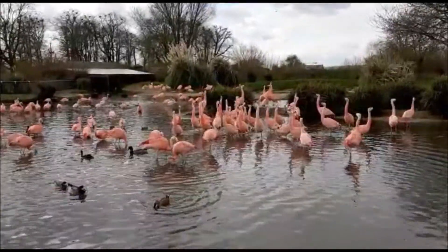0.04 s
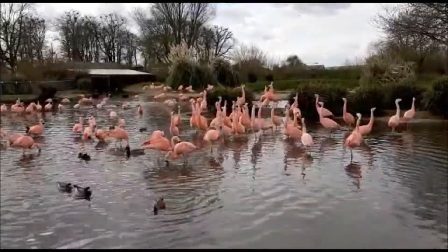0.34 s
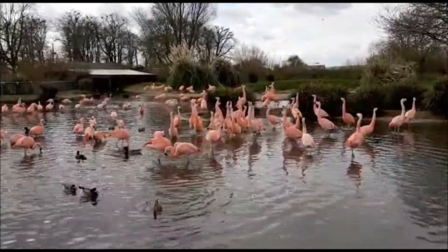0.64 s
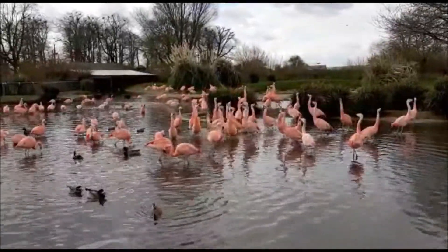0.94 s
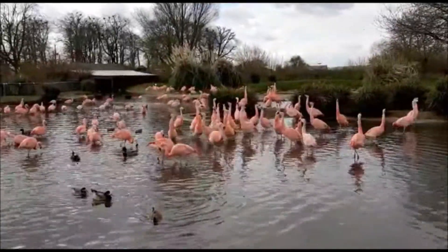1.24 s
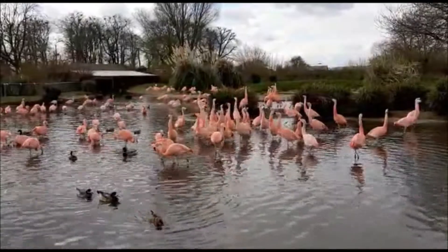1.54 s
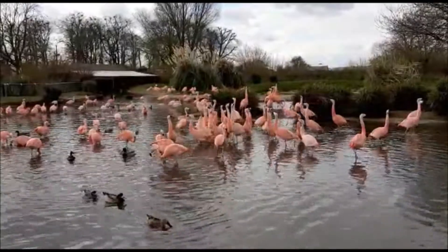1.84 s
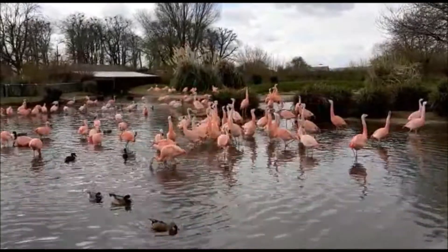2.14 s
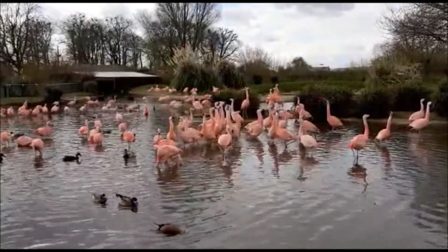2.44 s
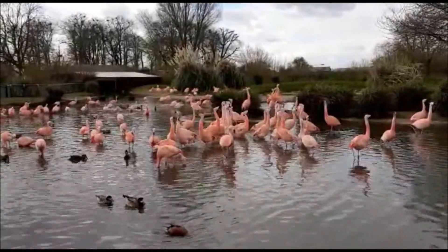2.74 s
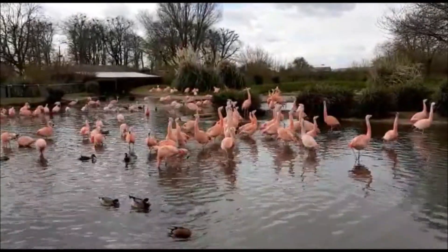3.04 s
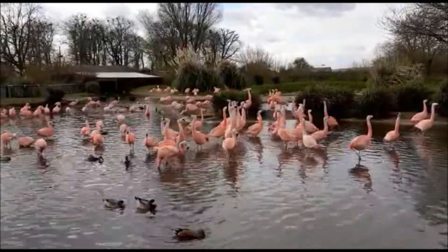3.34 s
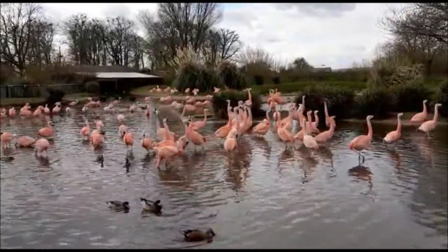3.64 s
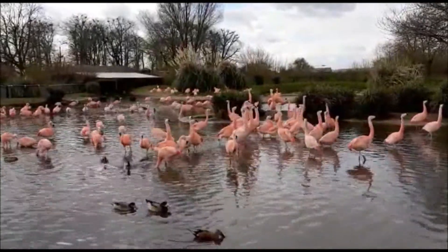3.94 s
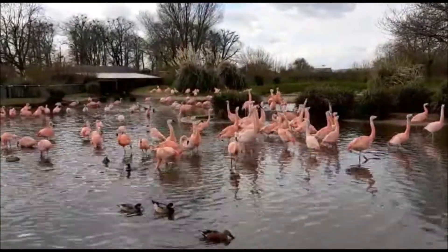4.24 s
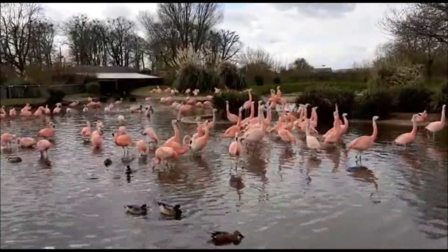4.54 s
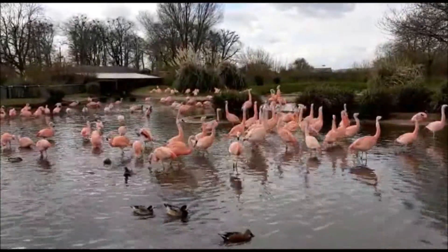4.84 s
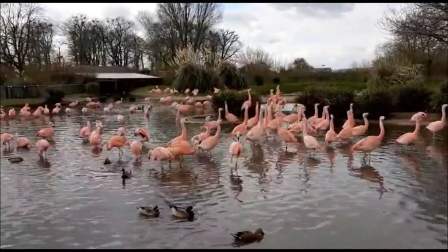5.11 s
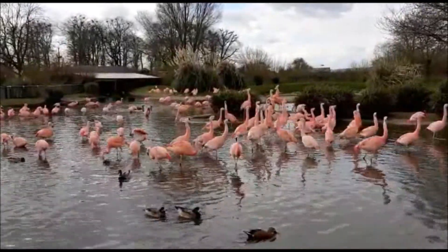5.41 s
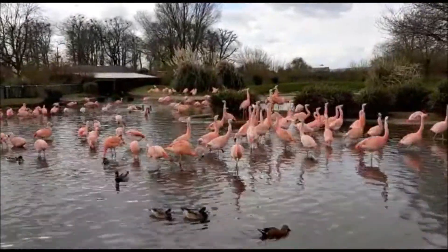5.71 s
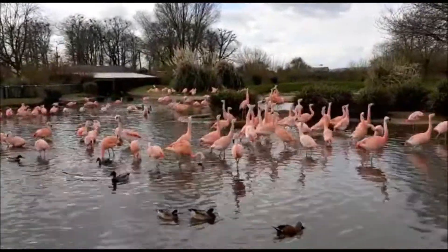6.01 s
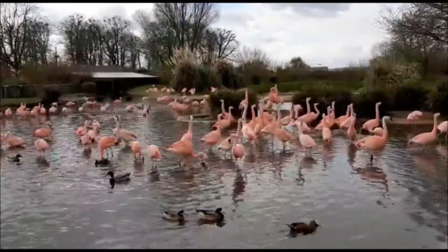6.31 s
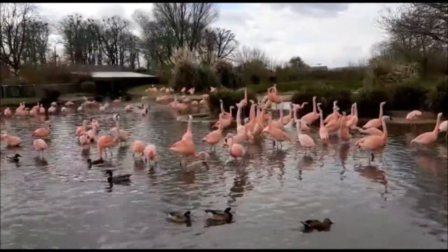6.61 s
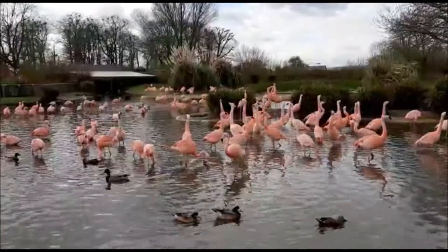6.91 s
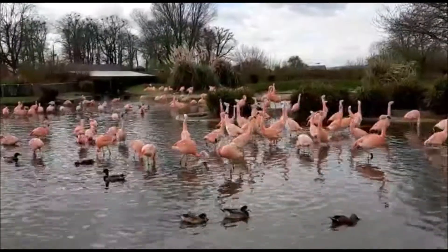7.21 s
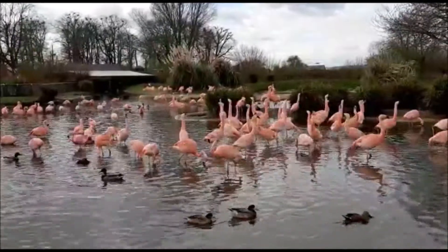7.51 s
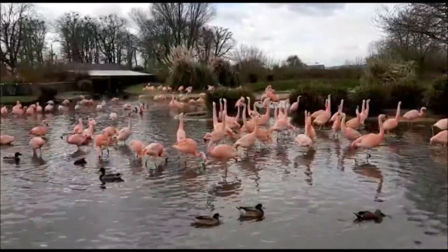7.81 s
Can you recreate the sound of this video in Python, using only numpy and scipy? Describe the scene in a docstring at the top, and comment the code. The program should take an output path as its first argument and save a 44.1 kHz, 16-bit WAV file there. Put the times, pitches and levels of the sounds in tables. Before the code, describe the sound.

Close microphones beside an outdoor pond pick up flamingos honking, grunting and gabbling over one another, with bursts of bill clacking. Behind them are distant flock chatter, light drips, low sloshing and a few plops. The calls are busiest in the first half, then ease into soft clucking. At the very end another bird gives four quick, hoarse yelps. Only faint echoes come back from the banks.

```python
"""Flamingos wading in a pond

A flock honks, grunts, gabbles and clucks: pulses of air from each voice box ring the throat, mouth
and bill. Most honks start as a rattle and clear into a tone. Bills clack, small birds peep, a
harsher bird yelps near the end, and legs stir the water. Two close microphones hear the near birds
almost dry, with faint echoes from the banks."""
import sys
import numpy as np
from scipy import signal
from scipy.fft import rfft, irfft
from scipy.io import wavfile
from scipy.ndimage import uniform_filter1d

SR = 44100
rng = np.random.default_rng(int(sys.argv[2]) if len(sys.argv) > 2 else 0)


def int16_out(signal):
    """Quantize to a 16-bit WAV file."""
    q = np.round(np.clip(np.atleast_2d(signal).T, -1, 1) * 32767)
    wavfile.write(sys.argv[1], SR, q.astype(np.int16))


N = 351036
TIME = np.arange(N) / SR
PULSES_PER_S, BILL_HZ = 101, 3817  # an ordinary rattle: its pace and the pitch at which the bill rings

# How busy the far flock and the water are over time: time_s, flock_db, water_db
ACTIVITY = [(0.0, -50, -74), (0.25, -52, -78), (0.64, -49, -72), (0.82, -53, -80), (1.33, -46, -67),
            (1.6, -53, -75), (2.0, -55, -77), (2.26, -49, -72), (2.46, -47, -76.5), (2.66, -49.5, -68),
            (3.0, -53, -77), (3.48, -55, -79), (4.19, -49, -72.5), (4.43, -52, -79), (4.74, -52, -68.5),
            (4.99, -59.5, -80), (7.29, -53, -80), (7.63, -63.5, -81.5), (7.87, -56.5, -74.5),
            (7.96, -56, -75)]


def amp(db):
    """Turn decibels into a gain."""
    return 10 ** (np.asarray(db) / 20)


def unit(x):
    """Scale a sound to an average power of one."""
    return x / np.sqrt(np.mean(x ** 2) + 1e-20)


def read(points, hz):
    """Read a value off a curve of (frequency, value) points."""
    f, value = np.transpose(points)
    return np.interp(np.log(hz + 1), np.log(f + 1), value)


def level(curve, column):
    """A gain for every sample, from a table of times and decibels."""
    rows = np.array(curve)
    return amp(np.interp(TIME, rows[:, 0], rows[:, column]))


def add(mix, start_s, sound, pan_db=0):
    """Place a sound in a stereo mix; a positive pan_db moves it left."""
    part = mix[:, max(round(start_s * SR), 0):][:, :len(sound)]
    part += amp([[pan_db / 2], [-pan_db / 2]]) * sound[:part.shape[1]]


def lag_left(x, samples):
    """Sound from the right reaches the left microphone a few samples late."""
    return np.array([np.roll(x[0], samples), x[1]])


def drift(count, per_s):
    """A random wander of about size one, with per_s new values a second."""
    knots = rng.standard_normal(int(count / SR * per_s) + 2)
    return np.interp(np.arange(count) / SR * per_s, np.arange(len(knots)), knots)


def course(start, end):
    """Position within a call, named u below: -1 at the start, 1 at the end."""
    return np.linspace(-1, 1, max(int((end - start) * SR), 256))


def phase(hz):
    """The running angle of a tone whose pitch changes."""
    return 2 * np.pi * np.cumsum(hz) / SR


def fade(u, share):
    """Fade in and out; the two fades together take this share of the call."""
    return signal.windows.tukey(len(u), share)


def resonance(hz, width):
    """A gain curve with one steep-sided peak."""
    return lambda f: (1 + ((f * f - hz * hz) / (2 * width * (f + 1))) ** 2) ** -2


def resonances(peaks):
    """A gain curve with several peaks, each given as pitch_hz, width_hz, level_db."""
    return lambda f: sum(amp(db) * resonance(hz, width)(f) for hz, width, db in peaks)


def ring(x, gain, size=2048):
    """Filter a sound by a gain curve so that it rings on a little, and even out its power."""
    log_gain = np.log(np.maximum(gain(abs(np.fft.fftfreq(size, 1 / SR))), 1e-5))
    taps = np.fft.ifft(np.exp(np.conj(signal.hilbert(log_gain)))).real[:size // 2]
    y = signal.fftconvolve(x, taps)
    return y / np.sqrt(np.sum(y ** 2) / len(x) + 1e-20)


def wash(gain, alike, patchy_db):
    """Stereo noise shaped by a gain curve, with drifting patches; alike=1 makes both sides the same."""
    hz = np.fft.rfftfreq(1024, 1 / SR)
    a, b, c, d, patches = rng.standard_normal((5, N // 256 + 5, len(hz)))
    patches = unit(uniform_filter1d(uniform_filter1d(patches, size=9, axis=0), size=10, axis=1))
    left = a + 1j * b
    right = alike * left + np.sqrt(1 - alike ** 2) * (c + 1j * d)
    spectra = np.array([left, right]) * gain(hz) * amp(patchy_db * patches)
    return unit(signal.istft(spectra.transpose(0, 2, 1), nperseg=1024, noverlap=768)[1][:, :N])


def banks(x, early_db, tail_db, early_s=0.036):
    """Echoes: quick scatter off the ripples, then a thin tail from hedges and trees."""
    # Time the tail takes to fall by 60 dB: frequency_hz, decay_s
    decay_times = [(150, 0.45), (1400, 0.19), (4000, 0.32), (12000, 0.015)]
    t = TIME[:SR * 2 // 3]
    noise = rng.standard_normal((2, len(t)))
    early = noise * np.exp(-t / early_s)
    hz, when, spectra = signal.stft(noise * (1 - np.exp(-t / 0.0031)), SR, nperseg=256)
    decay = amp(-60 * when / read(decay_times, hz)[:, None])
    tail = signal.istft(spectra * decay, SR, nperseg=256)[1][:, :len(t)]
    echo = amp(early_db) * early / np.linalg.norm(early[0])
    echo += amp(tail_db) * tail / np.linalg.norm(tail[0])
    return signal.fftconvolve(x, echo, axes=1)[:, :N]


def rumble():
    """A steady, distant rumble."""
    # Tone colour of the rumble: frequency_hz, gain_db
    colour = [(20, -59.5), (35, -26), (50, -6.5), (90, -4), (150, -11.5), (400, -36)]
    return amp(-69) * wash(lambda f: amp(read(colour, f)), alike=0.47, patchy_db=4.4)


def wind(puff_s=0.11, puff_hz=60.6):
    """Soft, low puffs of wind on the microphones."""
    # The puffs: middle_s, level_db
    gusts = [(6.22, -61), (6.7, -59)]
    strength = sum(amp(db) * np.exp(-((TIME - s) / puff_s) ** 2) for s, db in gusts)
    return strength * wash(resonance(puff_hz, 60), alike=0.5, patchy_db=1.5)


def slosh():
    """Wading birds push the water about with a low slosh."""
    # Strength of the slosh: time_s, level_db
    strength = [(0.0, -54.5), (0.38, -65.5), (0.42, -55), (0.97, -70), (1.37, -48), (1.48, -58),
                (2.1, -58.5), (2.28, -51.5), (2.48, -67.5), (2.77, -54.5), (3.37, -67.5), (4.3, -59),
                (4.32, -63), (5.74, -74), (6.01, -65), (7.65, -70), (7.89, -61.5), (7.96, -68)]
    # Its tone colour: frequency_hz, gain_db
    colour = [(40, -33.5), (80, -1.5), (110, -7), (190, 0.5), (300, -4), (420, -14), (900, -18.5),
              (2000, -73.5)]
    noise = wash(lambda f: amp(read(colour, f)), alike=0.98, patchy_db=4.07)
    return amp(1) * level(strength, column=1) * noise


def drips(per_s=70):
    """Small drips around wading legs, each a very short, high ping."""
    mix, t = np.zeros((2, N)), TIME[:SR // 100]
    for when, pitch, size, side in rng.random((int(per_s * N / SR), 4)):
        hz = 1700 * 4 ** pitch
        ping = np.sin(2 * np.pi * hz * t) * t * hz * np.exp(-t * hz / 2)
        add(mix, when * N / SR, amp(38 * size ** 3) * ping, 10 * (side - .5))
    return level(ACTIVITY, column=2) * amp(6) * unit(mix)


def fizz(flicker_db=2.8):
    """Stirred water sputters with a flickering hiss."""
    # Tone colour of the hiss: frequency_hz, gain_db
    colour = [(1500, -13), (3000, 10), (4300, 10), (6000, -2.5), (7700, -11), (11000, -9), (13000, -4),
              (16000, -13.5)]
    hiss = wash(lambda f: amp(read(colour, f)), alike=.3, patchy_db=2.5)
    flicker = unit(amp(flicker_db * drift(N, 110)))
    return level(ACTIVITY, column=2) * amp(16.5) * hiss * flicker


def spatter(clumps_per_s=14, drops=3, clump_s=.054, decay_s=.0009):
    """Drops fall in small clumps and tick crisply on the surface."""
    mix, age = np.zeros((2, N)), TIME[:SR // 100] / decay_s
    for when, side in rng.random((int(clumps_per_s * N / SR), 2)):
        for late, size in rng.random((drops, 2)):
            tick = np.exp(-age) * np.diff(rng.standard_normal(len(age) + 1))
            gain = amp(14 - 12 * np.sqrt(size))
            add(mix, when * N / SR + late * clump_s, gain * tick, 10 * (side - .5))
    return level(ACTIVITY, column=2) * mix


def plops(mix, decay_cycles=5):
    """A bubble rings and rises in pitch as it reaches the surface; large ones ring longer."""
    # Bubbles in the stirred water: start_s, level_db, pitch_hz
    bubbles = [(2.746, -46.5, 283), (4.224, -30, 1100), (4.235, -45.5, 221), (4.371, -37, 810),
               (5.383, -41.5, 1040), (5.984, -42, 820), (6.224, -43, 787), (6.759, -40.5, 1220)]
    t = TIME[:SR // 10]
    for start, db, hz in bubbles:
        tone = np.sin(2 * np.pi * hz * t * (1 + t * hz / 250))
        envelope = np.exp(-t * hz / decay_cycles) * (1 - np.exp(-t * hz / 0.15))
        add(mix, start, amp(db) * tone * envelope)


def far_honk(start, end, hz, db, fall):
    """Only the wavering, sinking lowest tone of a honk carries across the pond."""
    u = course(start, end)
    pitch = hz * (1 - fall * u / 2 + .02 * drift(len(u), 300))
    envelope = fade(u, .6) * (1 - .4 * u + .4 * drift(len(u), 150))
    return amp(db) * unit(np.sin(phase(pitch)) * envelope)


def far_flock(count=260, spread_db=14):
    """Many distant gabbles and thin honks from across the pond, over the blur of their echoes."""
    # Tone colour of the blur: frequency_hz, gain_db
    colour = [(210, -22), (350, -11.5), (500, -18), (670, -3.5), (1000, 1), (1500, 3.5), (1960, -0.5),
              (2790, -7.5), (3400, -21.5), (5000, -38), (7000, -57.5)]
    # Pitches that the far voices share: pitch_hz, width_hz, level_db
    shared_pitches = [(1535, 25, -7), (2009, 52, -14.5)]
    chatter, honking = np.zeros((2, 2, N))
    for when, length, rate, throat, size, side, mouth in rng.random((count, 7)):
        voice = pulsed_voice(0, .015 + .04 * length, rate=80 + 50 * rate,
                             throat_hz=750 + 850 * throat, throat_db=0, mouth_hz=1900 + 700 * mouth,
                             mouth_db=-14 + 14 * throat, bill_hz=3600, bill_db=-20)
        add(chatter, when * N / SR, amp(spread_db * size) * voice, 10 * (side - .5))
    for when, length, pitch, size, side in rng.random((count // 6, 5)):
        voice = far_honk(0, .08 + .12 * length, hz=1250 + 400 * pitch, db=6 * size, fall=.01)
        add(honking, when * N / SR, voice, 10 * (side - .5))
    chatter = chatter + banks(chatter, early_db=-7, tail_db=-8)
    blur = wash(lambda f: amp(read(colour, f)), alike=0.35, patchy_db=4)
    tones = wash(resonances(shared_pitches), alike=.43, patchy_db=3.5)
    flock = amp(-4.5) * unit(chatter) + amp(-8) * unit(honking) + amp(2.5) * blur + amp(-1.5) * tones
    return level(ACTIVITY, column=1) * flock


def echo_and_far_honk(mix):
    """A faint echo trails the last near honk, then a distant honk sinks in pitch."""
    # The echo, then the honk: start_s, end_s, pitch_hz, level_db, pitch_fall_share
    tones = [(4.79, 4.9, 905, -58, .01), (4.89, 4.99, 985, -59, .11)]
    for start, *settings in tones:
        add(mix, start, far_honk(start, *settings))


def peeps(mix):
    """Small birds on the left give quavering whistles that rise and fall."""
    # The peeps: start_s, end_s, top_pitch_hz, level_db, pitch_drop_share (at both ends)
    calls = [(0.157, 0.178, 5800, -49, .08), (0.339, 0.374, 7350, -54.5, .42),
             (0.748, 0.765, 5440, -53.5, .1), (0.961, 1.0, 7350, -55.5, .43), (3.36, 3.416, 2830, -64, .07),
             (3.566, 3.6, 2960, -62, .08), (5.367, 5.4, 7340, -65, .3), (6.212, 6.242, 5730, -65, .15)]
    for start, end, hz, db, drop in calls:
        u = course(start, end)
        pitch = hz * (1 - drop * u ** 2 + 0.024 * drift(len(u), 1400))
        envelope = fade(u, .5) * (1 + .45 * drift(len(u), 400))
        add(mix, start, amp(db) * unit(np.sin(phase(pitch)) * envelope), pan_db=7.5)


def sliding_whistles(mix):
    """A thin whistle and its octave fall ever faster."""
    # The whistles: start_s, end_s, first_hz, last_hz, level_db, octave_db (relative to the main tone)
    calls = [(4.535, 4.602, 2880, 2020, -56, -16), (4.652, 4.702, 2720, 2300, -53.5, -4)]
    for start, end, first_hz, last_hz, db, octave_db in calls:
        along = (course(start, end) + 1) / 2
        pitch = first_hz + (last_hz - first_hz) * along ** 1.3
        angle = phase(pitch * (1 + .024 * drift(len(along), 1100)))
        tone = np.sin(angle) + amp(octave_db) * np.sin(2 * angle)
        add(mix, start, amp(db) * unit(tone * fade(along, .5)))


def yelps(mix, arch=.055, closing_drop=.075):
    """A hoarse stack of harmonics arches and drops; each lights up as it crosses a throat resonance."""
    # The harsher bird's calls: start_s, end_s, top_pitch_hz, level_db
    calls = [(5.81, 5.838, 1610, -58.5), (7.719, 7.757, 1063, -47), (7.758, 7.803, 1138, -43.5),
             (7.807, 7.851, 1146, -42), (7.861, 7.899, 1112, -43.5)]
    # How its throat shapes the sound: frequency_hz, gain_db
    throat = [(1100, 0), (2000, -2), (2300, -8), (3000, -5), (3400, -10), (4400, -20), (5400, -19),
              (6400, -29), (7300, -12), (8000, -15), (9000, -26), (14000, -26)]
    for start, end, hz, db in calls:
        u = course(start, end)
        contour = 1 - arch * u ** 2 - closing_drop * np.maximum(u, 0) ** 2
        pitch = hz * (contour + .012 * drift(len(u), 1200))
        stack = 0
        for k in range(1, 14):
            harmonic = np.sin(k * phase(pitch) + 2 * np.pi * rng.random())
            stack += amp(read(throat, k * pitch)) * harmonic * (1 + .25 * drift(len(u), 500))
        add(mix, start, amp(db) * unit(stack * fade(u, .45)), pan_db=4.5)


def voice_box(hz, rough, puff_s, uneven_db):
    """Each opening of a bird's voice box gives a pulse and a short, rounded puff of air."""
    turns = np.cumsum(hz) / SR
    cycle = turns.astype(int)
    size = amp(uneven_db * rng.standard_normal(cycle[-1] + 1))[cycle]
    pulses = np.diff(cycle, prepend=-1).astype(float)
    age = (turns % 1) / hz / puff_s
    puffs = age * np.exp(-age) * rng.standard_normal(len(hz))
    rough = np.clip(rough, 0, 1)
    return size * (np.sqrt(1 - rough) * unit(pulses) + np.sqrt(rough) * unit(puffs))


def bursts(pace, hz, rise_s, scatter):
    """Each pulse rings as a rounded burst of tone, a little off the pitch and size of the last."""
    turns = np.cumsum(pace) / SR
    cycle = turns.astype(int)
    detune, size = rng.standard_normal((2, cycle[-1] + 1))[:, cycle]
    age = (turns % 1) / pace
    envelope = (age / rise_s) ** 2 * np.exp(-2 * age / rise_s) * amp(2 * size)
    angle = 2 * np.pi * hz * (1 + scatter * detune) * age + 0.35 * drift(len(age), 1500)
    return unit(envelope * np.sin(angle))


def bill(hz, width):
    """The gain curve of a bill: one high resonance on a wide, rasping base."""
    # The wide base: frequency_hz, gain_db
    base = [(100, -24), (300, -38.5), (600, -26), (2500, -10.5), (4800, -12), (6000, -27.5), (7700, -20.5),
            (13000, -27.5), (16000, -33)]
    return lambda f: resonance(hz, width)(f) + amp(read(base, f))


def clacks(mix, decay_s=0.0011):
    """A hollow bill snaps shut and rings for a moment."""
    # The snaps: start_s, level_db, bill_hz
    snaps = [(1.1175, -36, 4150), (1.1303, -25.5, 4380), (1.243, -27, 4300), (1.2504, -27, 4350),
             (1.2608, -24, 4370), (1.292, -28, 3720), (1.3053, -27.5, 3820), (1.345, -23, 3770),
             (1.3562, -23.5, 4220), (1.4218, -24, 2720), (1.99, -27.5, 3890), (2.006, -33, 3700),
             (2.024, -29, 3640), (2.0508, -28, 3630), (2.08, -30, 3510), (2.116, -34, 3950),
             (4.23, -33, 2480), (5.578, -39.5, 3130)]
    t = TIME[:SR // 50]
    age = t / decay_s
    for start, db, hz in snaps:
        noise = rng.standard_normal(len(t)) * age * np.exp(-age)
        snap = ring(noise, bill(hz, 490))[:len(t)]
        tone = (age * np.exp(1 - age)) ** 1.5 * np.sin(2 * np.pi * hz * t)
        add(mix, start, amp(db - 4) * snap / abs(snap).max() + amp(db - 2) * tone)


def knocks(mix, rise_s=0.0024):
    """One hard pulse rings the throat for a few cycles."""
    # The pulses: start_s, peak_db, throat_hz
    pulses = [(.2945, -36, 1330), (1.006, -32, 1250), (1.309, -29, 1210), (1.3225, -23.5, 1160),
              (1.3315, -29, 1200), (1.406, -23.5, 1220), (1.42, -27, 1350), (1.478, -29, 1200),
              (1.646, -31, 1300), (1.7635, -29, 1380), (3.0065, -32, 1330), (3.884, -35, 1150)]
    t = TIME[:SR // 50]
    envelope = (t / rise_s * np.exp(1 - t / rise_s)) ** 2
    for start, db, hz in pulses:
        add(mix, start, amp(db) * envelope * np.sin(2 * np.pi * hz * t))


def dry_rasps(mix, pulses_per_s=90, sag=0.028):
    """Slow pulses ring the bill alone, sinking a little in pitch."""
    # The high, dry rasps: start_s, end_s, bill_hz, level_db
    calls = [(0.041, 0.099, 3810, -51.5), (1.119, 1.246, 4010, -43.5), (1.267, 1.329, 3790, -41.5),
             (1.329, 1.44, 3710, -45.5), (2.704, 2.77, 4470, -42.5), (2.771, 2.872, 4240, -47),
             (4.045, 4.081, 4140, -48), (4.157, 4.214, 4020, -48.5), (6.972, 7.031, 4070, -60),
             (7.05, 7.296, 3600, -63.5), (4.713, 4.8, 3750, -54)]
    for start, end, hz, db in calls:
        u = course(start, end)
        pace = pulses_per_s * (1 + 0.046 * drift(len(u), 80))
        tone = bursts(pace, hz * (1 - sag * u), rise_s=0.0025, scatter=0.032)
        air = voice_box(pace, rough=0.63, puff_s=0.0015, uneven_db=2.3)
        hiss = ring(air, bill(hz, 750))[:len(u)]
        add(mix, start, amp(db) * unit((amp(0.5) * tone + hiss) * (1 - 0.18 * u ** 2)), pan_db=-2.5)


def pulsed_voice(start, end, rate, throat_hz, throat_db, mouth_hz, mouth_db, bill_hz, bill_db,
                 mouth_rise_s=0.0025):
    """Pulses slow enough to be heard apart ring the throat, the mouth and the rasping bill."""
    u = course(start, end + .004)
    pace = rate * (1 + 0.0293 * drift(len(u), 78.6))
    throat = bursts(pace, throat_hz, rise_s=0.002, scatter=0.1)
    mouth = bursts(pace, mouth_hz, mouth_rise_s, scatter=.022)
    mouth += .2 * bursts(pace, 1.25 * mouth_hz, rise_s=.002, scatter=.05)
    air = voice_box(pace, rough=0.65, puff_s=0.0016, uneven_db=2.9)
    rasp = ring(air, bill(bill_hz, 1200))[:len(u)]
    rasp += 0.23 * bursts(pace, bill_hz, rise_s=0.0039, scatter=0.053)
    swell = unit((1 - .3 * u ** 2 - .1 * u) * np.minimum((1 - u) * 12, 1))
    return swell * (amp(throat_db) * throat + amp(mouth_db) * mouth + amp(bill_db) * rasp)


def clucks(mix, usual_mouth_hz=2097, usual_throat_hz=1427):
    """A few soft pulses swell and fade behind a nearly shut bill, ringing mostly the mouth."""
    # Clucks from the right: start_s, end_s, mouth_hz, level_db
    calls = [(.88, .92, 2100, -47), (.495, .545, 2020, -44), (.946, 1.064, 2040, -44),
             (1.6, 1.635, 2100, -50), (1.775, 1.825, 2060, -46), (1.9, 1.95, 2120, -45),
             (2.125, 2.159, 2090, -47), (2.234, 2.301, 2130, -41), (2.578, 2.635, 2040, -45),
             (2.654, 2.717, 2140, -43), (4.268, 4.291, 1960, -40.5), (4.349, 4.362, 1900, -40),
             (5.46, 5.64, 2020, -54.5), (5.906, 5.929, 2060, -49), (6.072, 6.109, 2100, -47.5),
             (6.175, 6.21, 2100, -47), (6.396, 6.428, 2040, -47.5), (6.505, 6.562, 2080, -46),
             (6.607, 6.651, 2080, -45.5), (6.866, 6.9, 2060, -48.5), (7.238, 7.279, 2010, -47),
             (7.348, 7.39, 2060, -46.5), (7.637, 7.69, 2040, -52), (7.741, 7.757, 2040, -41.5),
             (7.772, 7.84, 2060, -43), (7.917, 7.934, 2040, -44)]
    for start, end, hz, db in calls:
        throat_hz = usual_throat_hz * hz / usual_mouth_hz
        throat_db = db - 8 - 0.0378 * (hz - usual_mouth_hz)  # lower clucks have a fuller throat
        voice = pulsed_voice(start, end, 108, throat_hz, throat_db, hz, db, BILL_HZ, db - 19,
                             mouth_rise_s=.0026)
        swell = unit(1 - .6 * np.linspace(-1, 1, len(voice)) ** 2)
        add(mix, start, voice * swell, pan_db=-4)


def rattle(start, end, throat_hz, db, open_db):
    """Effort speeds up the pulses; an opening bill raises and strengthens the mouth resonance."""
    ordinary_db, pace_doubles_db = -44, 27
    effort_db = db + max(open_db, 0) / 2 - ordinary_db
    rate = PULSES_PER_S * 2 ** (effort_db / pace_doubles_db)
    mouth_hz = 2336 + 34.5 * open_db
    mouth_db = db - 3.5 + 1.4 * open_db
    return pulsed_voice(start, end, rate, throat_hz, db, mouth_hz, mouth_db, BILL_HZ, db + open_db)


def gabbles(ahead, right):
    """Birds ahead and to the right gabble in short rattles."""
    # The gabbles: start_s, end_s, throat_hz, throat_db, bill_over_throat_db, pan_db
    calls = [(.293, .352, 1323, -44, -8, 0), (.788, .824, 1420, -46, -10, -1),
             (1.15, 1.195, 1130, -44, -9, -1), (1.241, 1.284, 1040, -45, 4, 0),
             (1.326, 1.392, 1050, -44, 6, 1), (1.406, 1.445, 1200, -40, 2, 1),
             (1.49, 1.55, 1133, -46, 1, -3), (1.653, 1.693, 1310, -47, 2, 0),
             (2.115, 2.159, 1340, -50, 1, -4), (2.234, 2.301, 1160, -42, -8, -4),
             (2.478, 2.513, 1450, -45.5, -14, 5), (2.889, 2.916, 1255, -42.5, -5, 2),
             (3.089, 3.125, 1320, -45, -4, -2), (3.772, 3.81, 1275, -47, -12, 2),
             (3.944, 3.974, 1230, -49, -5, 4), (4.536, 4.568, 1064, -44, -12, 3),
             (4.74, 4.814, 975, -48, -5, 0), (6.228, 6.268, 1050, -54, -16, -2),
             (7.052, 7.068, 1350, -56, -8, -2), (7.143, 7.17, 1400, -56, -11, -2)]
    for start, *settings, pan_db in calls:
        add(right if pan_db < -1.5 else ahead, start, rattle(start, *settings), pan_db)


def grunts(mix, neck_delay_s=.00055):
    """Jittery, breathy pulses travel up the long neck and ring chest, throat, mouth and bill in turn."""
    # Nasal grunts: start_s, end_s, pitch_hz, roughness (0-1), throat_hz, throat_db,
    # chest_db, mouth_db, bill_db (the last three relative to the throat)
    calls = [(0, .034, 240, .15, 1220, -45, -1, -3, -2), (.103, .19, 242, .15, 1240, -47.5, 2, -1, -3),
             (.395, .435, 285, .5, 1150, -42, -7, -11, -9), (.49, .557, 275, .55, 1170, -41.5, -6, -7, -9),
             (.571, .658, 338, .38, 1130, -40.5, -4, -7, -8),
             (.658, .72, 288, .12, 1110, -38.5, -16, -14, -8),
             (1.262, 1.335, 178, .1, 900, -42, -20, -10, -9),
             (1.33, 1.428, 181, .1, 830, -40.5, -14, -8, -9),
             (2.202, 2.236, 236, .3, 1140, -39.5, -10, -10, -9),
             (2.303, 2.39, 252, .12, 1130, -39.5, -8, -8, -6),
             (2.383, 2.425, 195, .6, 1050, -48, -12, -8, -8),
             (2.498, 2.549, 294, .3, 1050, -35.5, -14, -11, -10)]
    # Resonances of the chest, the mouth and the bill: pitch_hz, width_hz, level_db
    chest_peaks = [(295, 220, -2), (490, 110, -7), (720, 150, 4.5)]
    mouth_peaks = [(2040, 280, 0), (2570, 330, -4)]
    bill_peaks = [(3350, 420, -1), (3850, 420, -1), (4800, 600, -8), (6200, 1600, -17), (13000, 3000, -24)]
    for start, end, hz, rough, throat_hz, db, chest_db, mouth_db, bill_db in calls:
        u = course(start, end)
        wander = .06 * rough * drift(len(u), 200) + .011 * drift(len(u), 450)
        pitch = hz * (1.015 - .08 * np.maximum(u, 0) ** 3 - .035 * u ** 2 + wander)
        air = voice_box(pitch, .04 + rough ** 2, puff_s=.0005, uneven_db=1 + 3 * rough) * fade(u, .5)
        parts = [(chest_db, chest_peaks), (0, [(throat_hz, 250, 0)]),
                 (mouth_db, mouth_peaks), (bill_db, bill_peaks)]
        for k, (part_db, peaks) in enumerate(parts):
            part = np.roll(ring(air, resonances(peaks)), round(k * neck_delay_s * SR))
            opening = unit(amp(1.8 * drift(len(part), 70)))
            add(mix, start, (-1) ** k * amp(db + part_db) * opening * part)


def honk(start, end, hz, db, second_db, third_db, fall, bend, swell_db, rough, flutter_hz=470.5):
    """A tone bends, swells and flutters; returns its lowest tone and its overtones with bill rasp."""
    # Rasping resonances of the bill: pitch_hz, width_hz, level_db
    bill_peaks = [(900, 200, -2), (2050, 300, -2), (2650, 380, -7), (3650, 380, -2), (5000, 700, -9)]
    u = course(start, end)
    contour = 1 - fall * u / 2 + bend * u ** 2 - .05 * np.maximum(u, 0) ** 12
    pitch = hz * (contour + .04 * rough * drift(len(u), 700))
    angle = phase(pitch)
    beat = np.sin(phase(flutter_hz * (1 + .15 * drift(len(u), 300))))
    throb = np.sin(phase(PULSES_PER_S * (1 + .15 * drift(len(u), 100))))
    flutter = rough * (.24 * beat + .22 * throb + .2 * drift(len(u), 700))
    lowest = np.sqrt(2) * np.sin(angle) * (1 + flutter)
    upper = amp(second_db) * np.sin(2 * angle)
    upper += amp(third_db) * (np.sin(3 * angle) + amp(-20.5) * np.sin(4 * angle))
    upper *= np.sqrt(2) * (1.15 - .5 * u ** 2 + 2.5 * flutter)
    air = voice_box(pitch / 4, rough=.6, puff_s=0.00038, uneven_db=4.5) * (1 + .6 * throb)
    rasp = rough * amp(-12) * ring(air, resonances(bill_peaks))[:len(u)]
    arch = 1 - (.25 + .5 * rough) * u ** 2
    envelope = amp(db) * unit(fade(u, .35) * arch * amp(swell_db * u / 2))
    return envelope * lowest, envelope * (upper + rasp)


def honks(wide, close, ahead, ordinary_db=-32.5, overlap=0.15):
    """Most honks open with a rattle and clear into a tone; the last swells straight from its tone."""
    # The honks: rattle_start_s, tone_start_s, end_s, pitch_hz, level_db, second_harmonic_db,
    # third_harmonic_db (both relative to the first), pan_db, pitch_fall_share,
    # pitch_bend_share (ends above the middle), swell_db (start to end), roughness (0-1)
    calls = [(.396, .425, .47, 1342, -33, -27, -17, 3, 0, .005, 0, .3),
             (.492, .535, .606, 1341, -30.5, -26, -18, 1, .003, 0, 0, .3),
             (.885, .913, .943, 1305, -35, -26, -18, 3, 0, .015, 0, .4),
             (.996, 1.018, 1.062, 1038, -39, -12, -15, 0, .04, .015, 0, .4),
             (1.116, 1.138, 1.165, 1475, -37, -20, -14, 0, .05, -.02, 0, .5),
             (1.477, 1.486, 1.548, 1158, -27, -25, -20, 3, .02, .055, 0, .15),
             (1.764, 1.774, 1.824, 1338, -30.5, -28, -15, 4, .012, .008, 1, .35),
             (1.866, 1.891, 1.96, 1346, -27.3, -23, -11.5, 4, .022, -.012, -1, .15),
             (2.585, 2.606, 2.644, 1289, -34.5, -21, -21, 3, .01, .003, 0, .35),
             (3.006, 3.021, 3.069, 1352, -30.5, -19, -17, 5, 0, .003, 0, .55),
             (3.125, 3.145, 3.209, 1346, -29, -21, -13, 6, -.014, -.008, -1, .3),
             (3.884, 3.903, 3.925, 1305, -40, -22, -22, 4, .015, 0, 0, .7),
             (3.984, 4.009, 4.05, 1027, -35.5, -14, -23, 0, .022, .012, 0, .65),
             (4.101, 4.124, 4.151, 1290, -37.5, -21, -20, 4, 0, .005, 0, .55),
             (4.632, 4.638, 4.707, 1058, -38.5, -18, -13, 1, .012, .01, 0, .45),
             (4.715, 4.698, 4.8, 914, -37.5, -23, -18, 4, .04, .008, 11, .5)]
    for rattle_start, start, end, hz, db, second_db, third_db, pan_db, *shape in calls:
        lowest, overtones = honk(start, end, hz, db, second_db, third_db, *shape)
        add(wide, start, lowest, pan_db)  # the lowest tone spreads wider than its overtones
        add(close, start, overtones)
        rattle_end = start + overlap * (end - start)
        rattle_db = -44.5 + 0.97 * (db - ordinary_db)  # a louder honk has a louder rattle
        add(ahead, rattle_start, rattle(rattle_start, rattle_end, hz, rattle_db, open_db=-7), pan_db=-2.5)


def scene():
    """Mix the birds and the pond. The nearest calls are almost dry; the others echo more."""
    wide, ahead, right, close = np.zeros((4, 2, N))
    honks(wide, close, ahead)
    grunts(ahead)
    gabbles(ahead, right)
    clucks(right)
    echo_and_far_honk(ahead)
    sliding_whistles(close)
    knocks(close)
    dry_rasps(ahead)
    yelps(close)
    peeps(close)
    clacks(close)
    plops(ahead)
    near = lag_left(wide, samples=7) + close
    farther = lag_left(ahead, samples=1) + lag_left(right, samples=15)
    echoes = banks(near, early_db=-19, tail_db=-21) + banks(farther, early_db=-11, tail_db=-16)
    birds = near + farther + echoes + lag_left(far_flock(), samples=11)
    return birds + drips() + fizz() + spatter() + rumble() + slosh() + wind()


def record(dry, top_hz=15900):
    """The microphone openings notch the treble and favour the left near 6 kHz; the very top is cut."""
    # Tone colour that both microphones share: frequency_hz, gain_db
    response = [(22, -6), (48, 1), (7700, -1.5), (8400, -21), (9000, -19.5), (10300, -10), (12000, -1.5),
                (13000, -4)]
    # Balance between the two: frequency_hz, left_over_right_db
    balance = [(20, -2.5), (1300, 0), (2200, -3), (4000, 1), (6000, 14.5), (8000, 5.5), (12000, -9.5)]
    hz = np.fft.rfftfreq(N, 1 / SR)
    gain = amp(read(response, hz) + np.outer([.5, -.5], read(balance, hz)))
    coloured = irfft(rfft(dry) * gain, N)
    low_pass = signal.firwin(511, top_hz, window=("kaiser", 9), fs=SR)
    return signal.oaconvolve(coloured, low_pass[None], "same")


dry = scene()
out = record(dry)
int16_out(out)
```